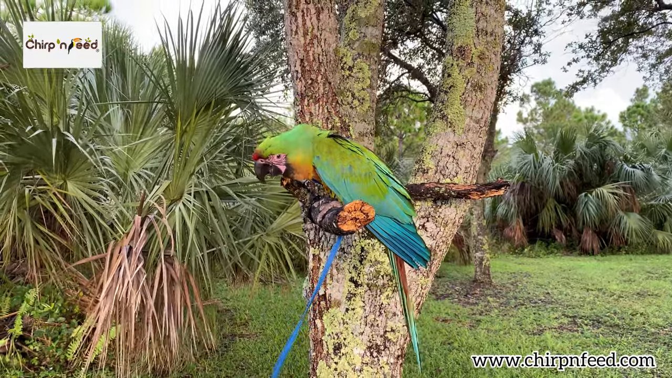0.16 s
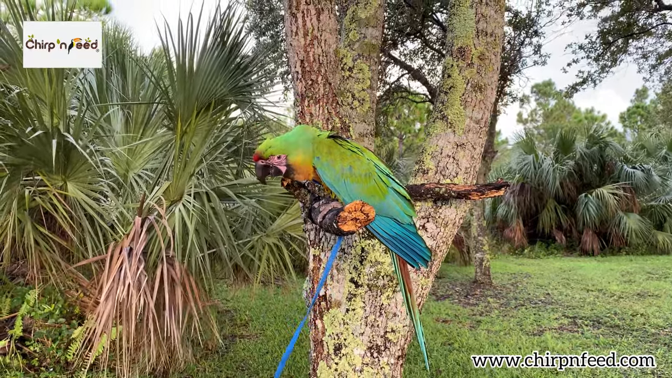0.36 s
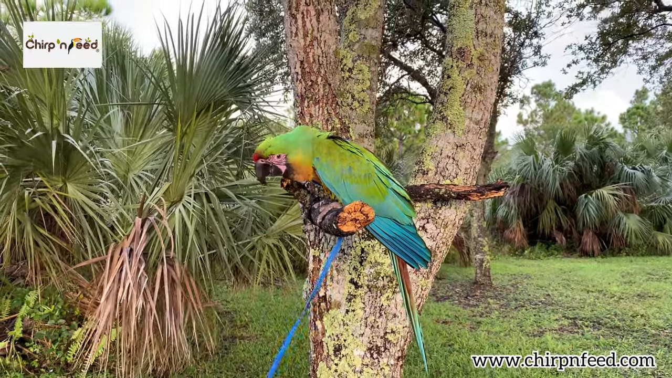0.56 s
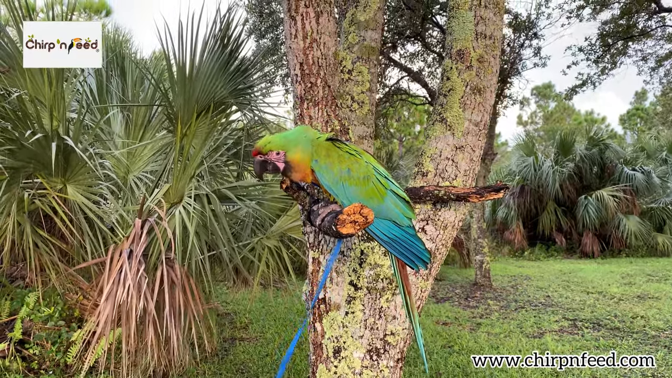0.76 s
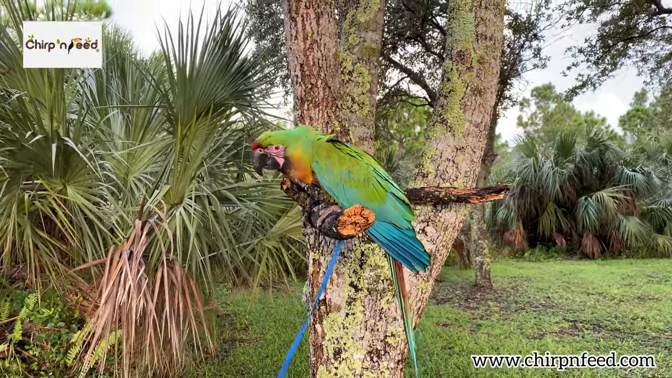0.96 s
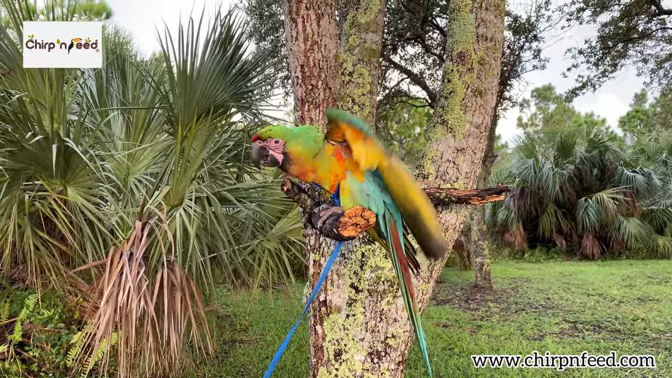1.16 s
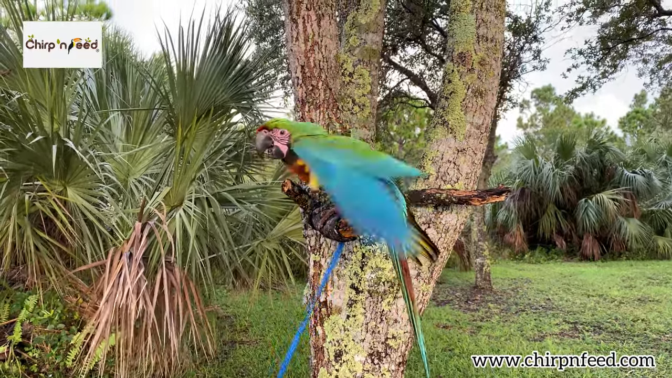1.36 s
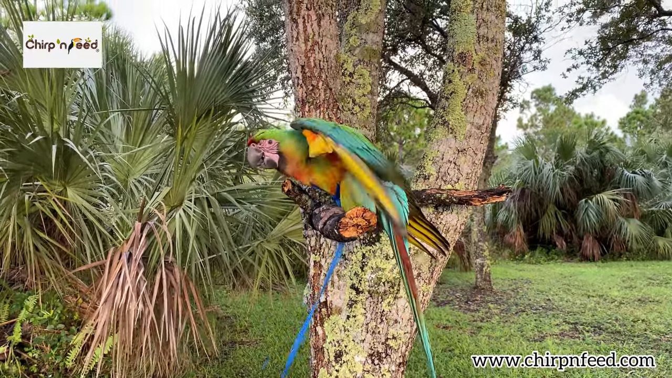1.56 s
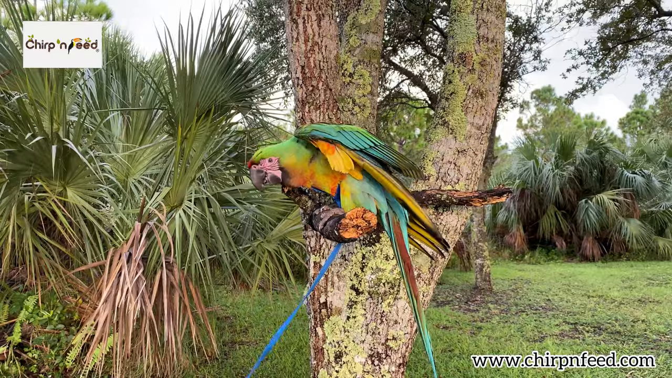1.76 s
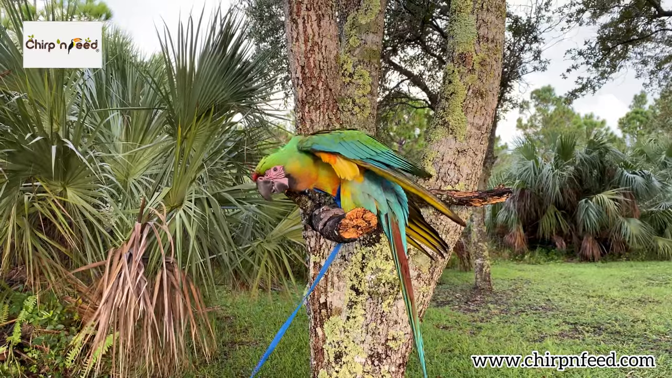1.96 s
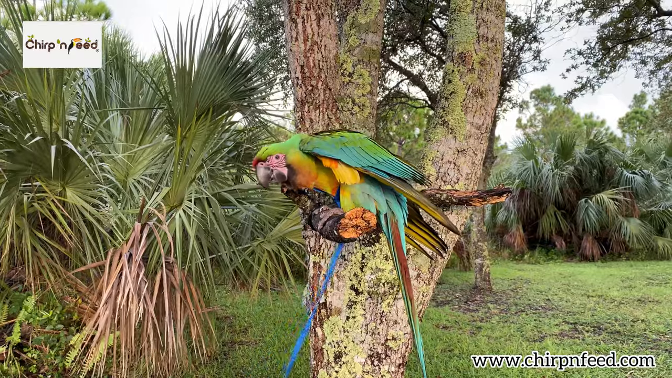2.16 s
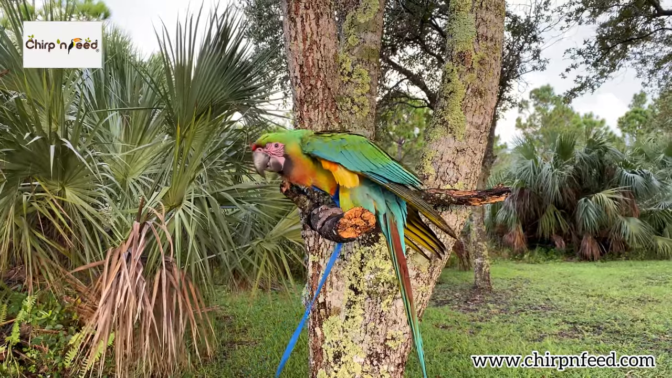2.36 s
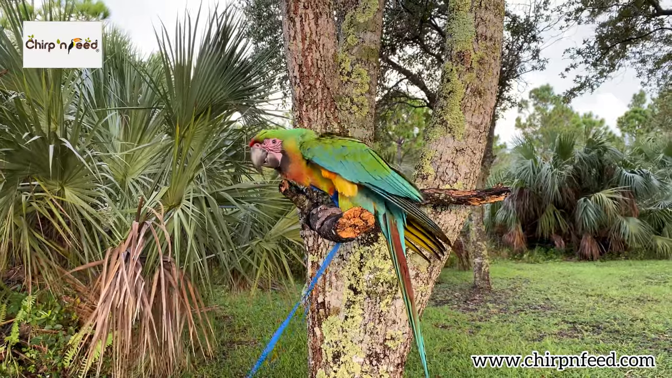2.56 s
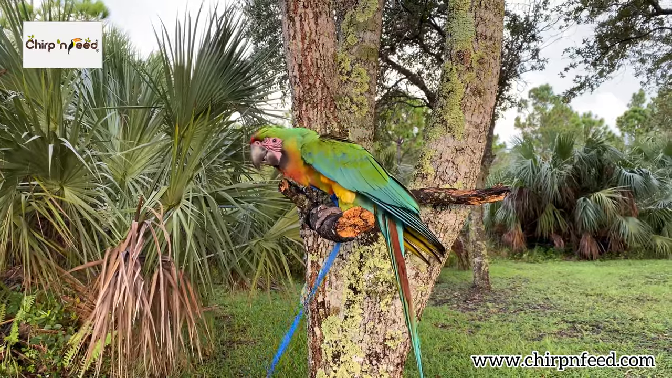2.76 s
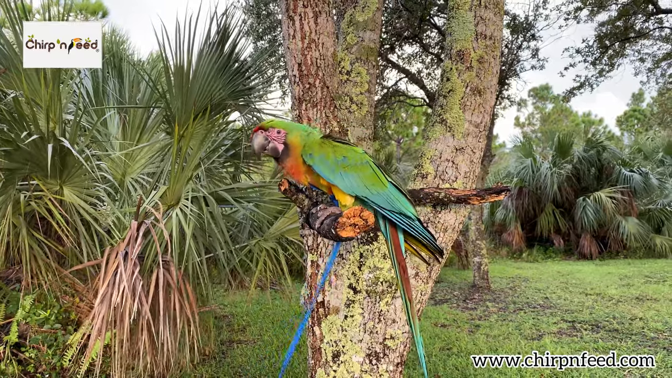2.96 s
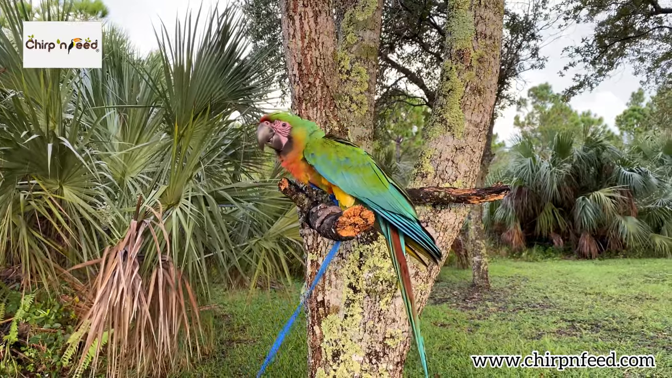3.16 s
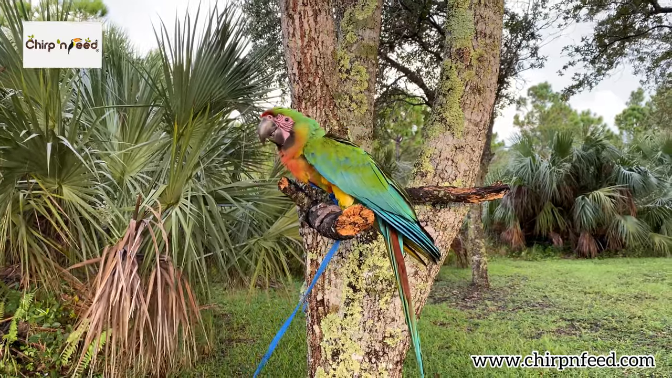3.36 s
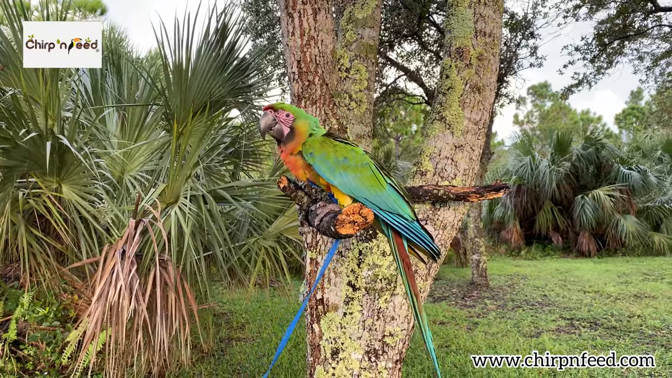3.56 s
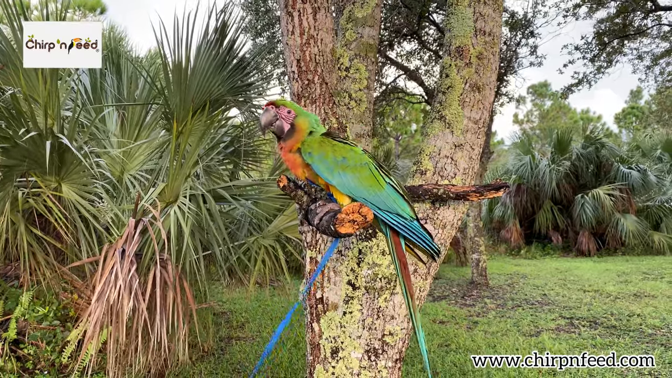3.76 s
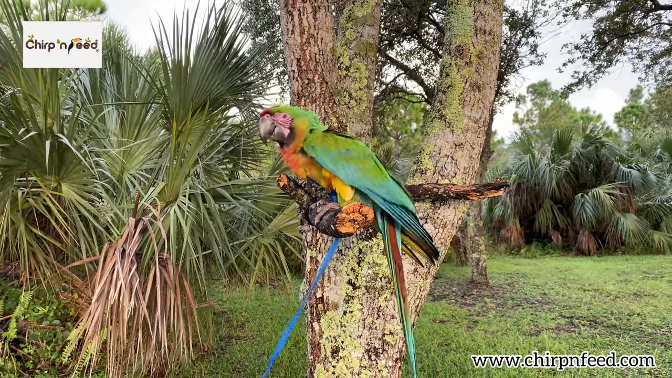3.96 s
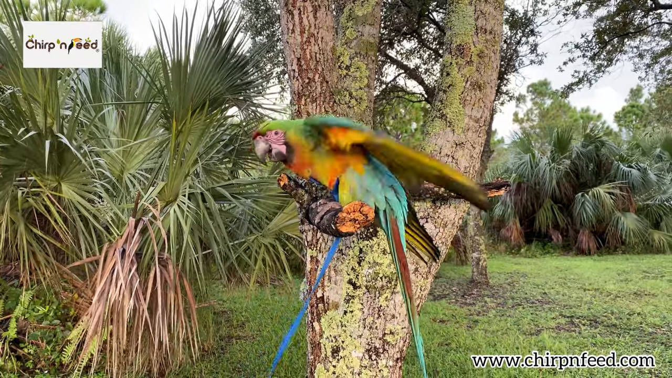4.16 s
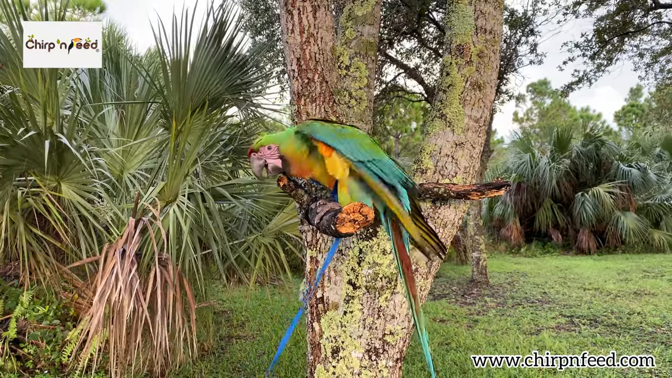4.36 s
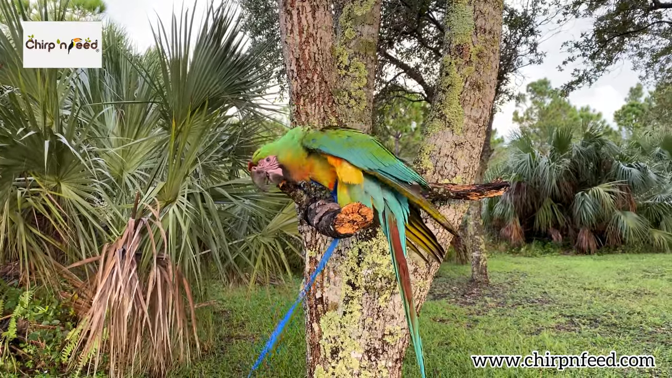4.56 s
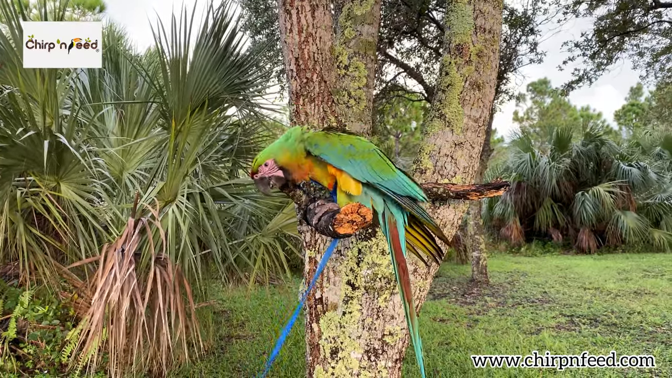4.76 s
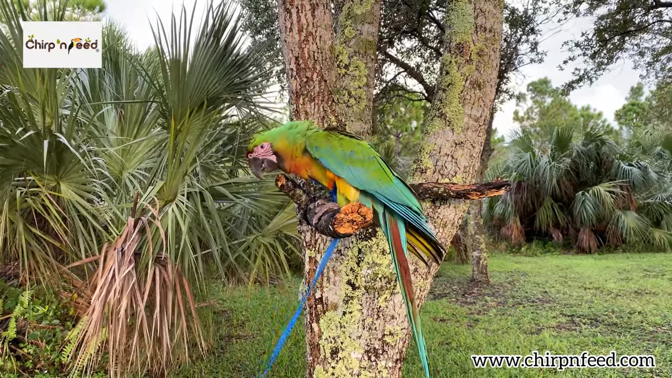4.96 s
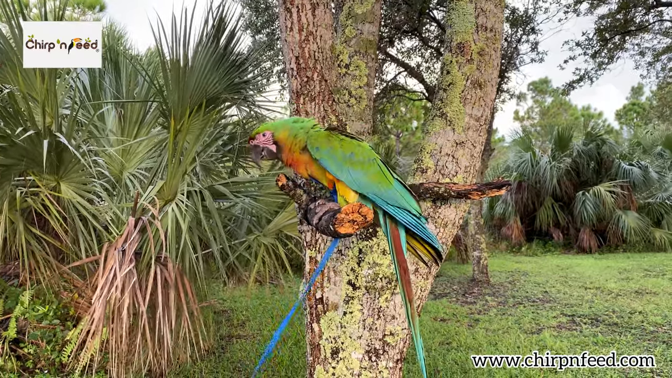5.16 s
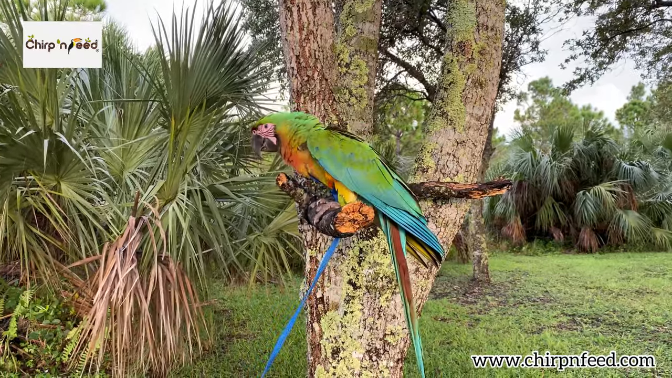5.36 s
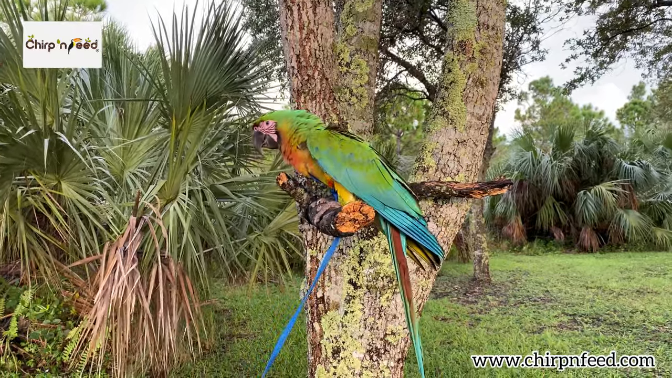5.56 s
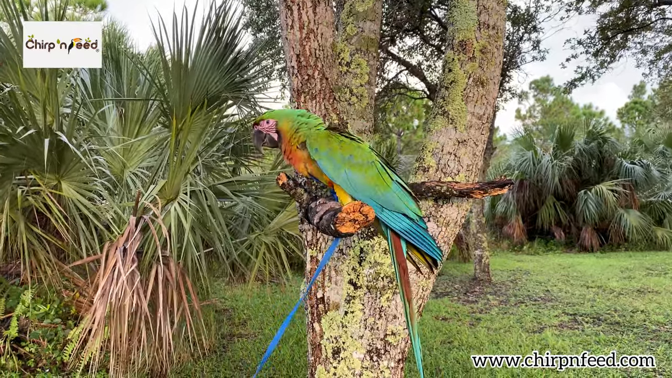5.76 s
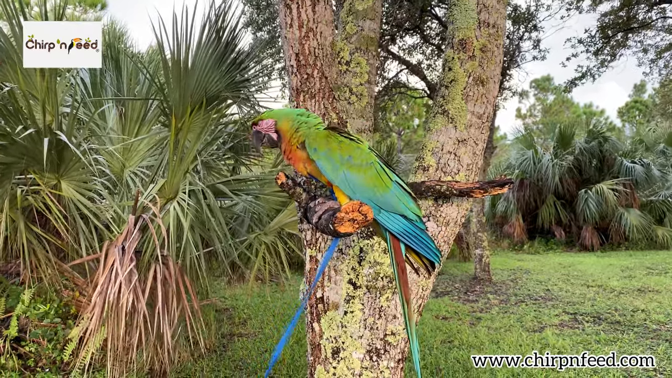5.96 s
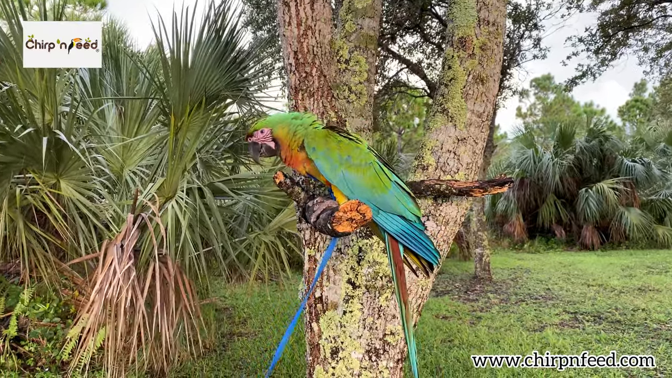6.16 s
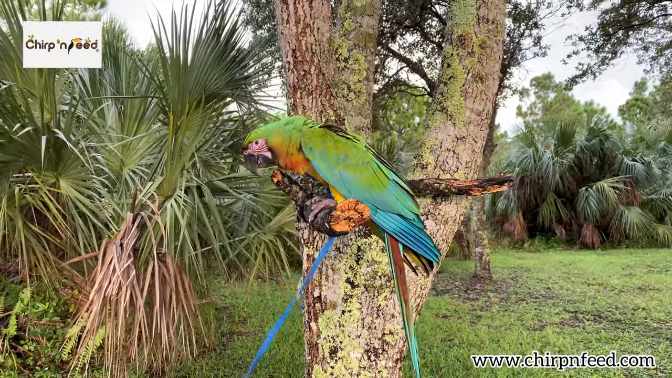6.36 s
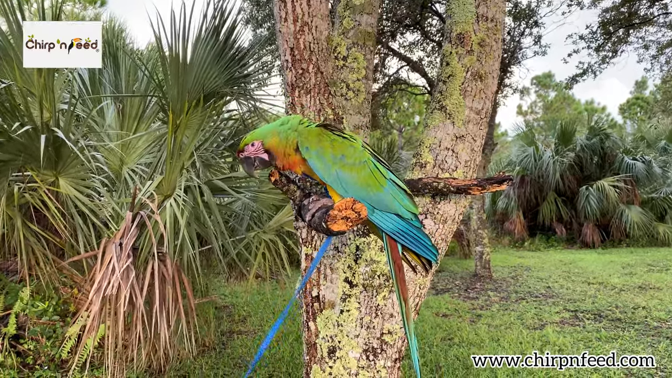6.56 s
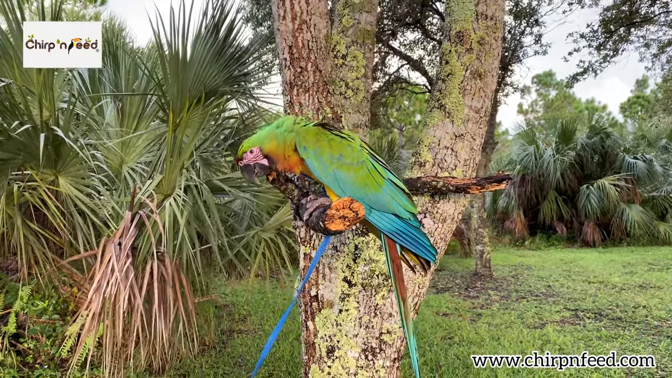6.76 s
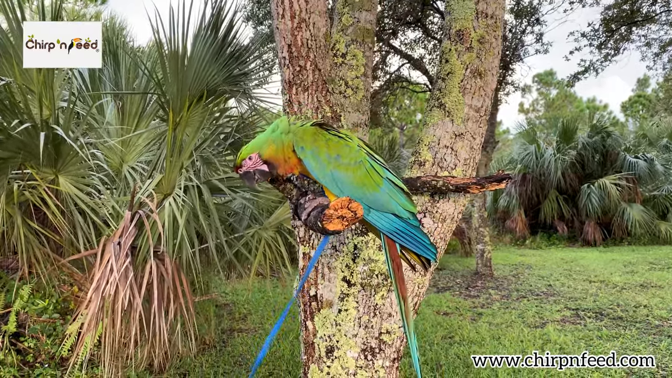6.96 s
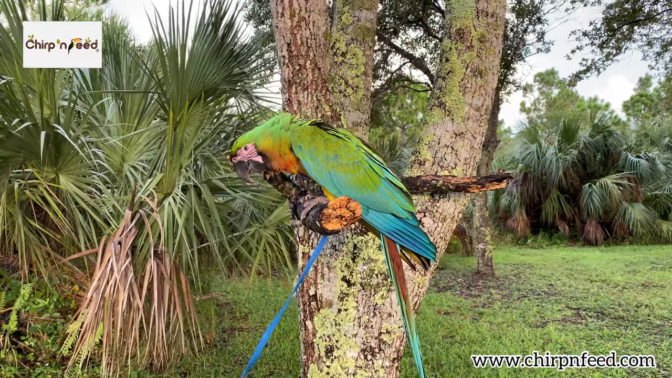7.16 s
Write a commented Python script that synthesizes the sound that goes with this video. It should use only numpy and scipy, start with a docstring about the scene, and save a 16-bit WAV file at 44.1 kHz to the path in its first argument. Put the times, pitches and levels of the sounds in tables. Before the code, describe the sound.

Close stereo pickup of a macaw among trees and lawn: a quiet, rumbling background with gentle wind thumps, then a sudden raspy quarter-second squawk and crisp wing flicks. A car swells faintly far off, and a stronger gust passes. Another rough, bright squawk follows about three seconds after the first, with light feather noise. Faint whistling chirps, insect buzzes and a remote drone fill the quiet ending.

```python
"""Macaw on a garden perch

A macaw close to two microphone ports flicks its wings and gives two short, harsh squawks: rough pulses
ring in throat and beak, cracks are added, and a reflection off the lawn doubles each call.
Filtered noise makes light wind rumble, far traffic, passing cars, a distant drone, leaves, insects,
one dry tick and faint microphone hiss. Small birds are gliding sine whistles blurred by the trees."""
import sys
import numpy as np
from scipy import signal
from scipy.fft import rfft, irfft
from scipy.io import wavfile
from scipy.ndimage import uniform_filter1d

SR = 44100
rng = np.random.default_rng(int(sys.argv[2]) if len(sys.argv) > 2 else 0)


def generate_wav(signal):
    """Clip the signal to [-1, 1] and save it as 16-bit WAV at the path in sys.argv[1]."""
    frames = np.transpose(np.atleast_2d(signal))
    scaled = np.clip(frames, -1, 1) * 32767
    pcm = np.round(scaled).astype(np.int16)
    wavfile.write(sys.argv[1], SR, pcm)


N = 317520
TIME = np.arange(N) / SR
FREQS = np.maximum(np.fft.rfftfreq(N, 1 / SR), 1)


def from_db(db):
    """Decibels to gain."""
    return 10 ** (np.asarray(db) / 20)


def rms_one(x):
    """Scale to unit rms."""
    return x / np.sqrt(np.mean(x ** 2) + 1e-20)


def in_hz(points):
    """A spectrum table at every frequency, joined on a log axis."""
    hz, value = np.transpose(points)
    return np.interp(np.log(FREQS), np.log(hz), value)


def left_right(balance_db):
    """Gains of the two channels from left minus right in dB."""
    return from_db(np.array([balance_db, -balance_db]) / 2)


def drift(rate_hz):
    """Slow chance with unit rms, made by low-passing noise."""
    smooth = 1 / (1 + (FREQS / rate_hz) ** 2) ** 2
    return rms_one(irfft(rfft(rng.standard_normal(N)) * smooth, N))


def resonance(x, hz, width_hz):
    """Two-pole band-pass with gain 1 on top."""
    r = np.exp(-np.pi * width_hz / SR)
    numerator = np.array([1, 0, -1]) * (1 - r * r) / 2
    denominator = [1, -2 * r * np.cos(2 * np.pi * hz / SR), r * r]
    return signal.lfilter(numerator, denominator, x + 1e-18)


def colour(x, spectrum):
    """Causal (minimum-phase) filter of unit energy: it rings only after each pulse."""
    cepstrum = irfft(np.log(from_db(in_hz(spectrum))), N)
    # fold the second half of the cepstrum onto the first
    cepstrum[1:N // 2] *= 2
    cepstrum[N // 2 + 1:] = 0
    response = np.exp(rfft(cepstrum))
    unit_response = response / np.sqrt(np.mean(np.abs(response) ** 2))
    return irfft(rfft(x) * unit_response, N)


def air_noise(spectrum):
    """Stereo noise of rms 1: mixed mid and side noise sets how alike the ports are at each pitch."""
    # likeness of the two ports: hz, likeness (-1 to 1)
    likeness = [(60, 0.46), (130, 0.62), (300, 0.84), (640, 0), (1000, -0.28), (1400, -0.55), (3100, 0.15),
                (7000, 0), (15000, 0.14)]
    # lean of the noise across the ports: hz, left_minus_right_db
    lean = [(60, 0), (110, 0.5), (200, 0), (380, 3), (700, -0.5), (1290, -2.5), (2380, -2.0), (4400, 7),
            (8120, 0), (15000, 0.5)]
    mid, side = rfft(rng.standard_normal((2, N)))
    alike = np.clip(in_hz(likeness), -1, 1)
    pair = np.sqrt(1 + alike) * mid + np.sqrt(1 - alike) * side * [[1], [-1]]
    return rms_one(irfft(pair * from_db(in_hz(spectrum)) * left_right(in_hz(lean)), N))


def swells(rows):
    """A bell-shaped envelope round the middle of each event."""
    envelope = 0
    for middle_s, length_s, level_db in rows:
        distance_squared = np.minimum((2 * (TIME - middle_s) / length_s) ** 2, 20)
        envelope = envelope + from_db(level_db) * np.exp(-distance_squared)
    return envelope


def held(start_s, length_s, edge_s):
    """Rise, hold and fall between 0 and 1; half way up at the start and at the end."""
    nearest_end = np.minimum(TIME - start_s, start_s + length_s - TIME)
    return np.clip(nearest_end / edge_s + .5, 0, 1)


def spells(rows, edge_s):
    """Gain of held events whose powers add."""
    return np.sqrt(sum(from_db(db) ** 2 * held(start, length, edge_s) for start, length, db in rows))


def trees(x, t60_s, dull_hz):
    """Diffuse scatter from trunks and fronds: a fading noise tail, different on each side."""
    t = TIME[:SR]
    fade = from_db(-60 * t / t60_s) * (1 - np.exp(-t / 0.0017))
    tail = rng.standard_normal((2, SR)) * fade
    tail = signal.sosfilt(signal.butter(1, min(dull_hz, SR / 3), fs=SR, output="sos"), tail)
    return signal.fftconvolve(x[None], rms_one(tail) / np.sqrt(SR), axes=1)[:, :N]


def distance(waver_db):
    """Coloured noise for far traffic, passing cars, a drone that grows later on, and leaves."""
    # colour of far traffic: hz, relative_db
    traffic_colour = [(25, -44), (60, -23.5), (130, -1), (250, -4), (420, -5), (620, -12.5), (850, -7.5),
                      (1050, -10.5), (1400, -18), (2000, -24), (3000, -36), (5000, -64.5), (12000, -72),
                      (14000, -73)]
    # cars that swell and fade as they pass: nearest_s, length_s, level_db
    cars = [(0, 0.53, -67), (2.55, 1.83, -53.5)]
    # colour of their engines and tyres: hz, relative_db
    car_colour = [(70, -5), (170, 22), (330, 3), (650, -4), (900, 13), (1040, 18), (1200, 8.5), (1600, -43)]
    # a distant drone that comes and goes: start_s, length_s, level_db
    drones = [(-.3, 0.96, -72.5), (2.9, 1.6, -80), (4.35, 0.64, -65), (4.95, 0.87, -66), (5.75, 3.6, -62.3)]
    # colour of the drone: hz, relative_db
    drone_colour = [(900, -33), (1300, -0.5), (1800, 2.5), (2050, 0), (2300, 5), (2600, -13.5), (3500, -19),
                    (6000, -43.5)]
    # stirrings of the leaves over their faint hiss: middle_s, length_s, level_db
    rustles = [(0, 1.66, -77), (1.6, 1.7, -86), (2.7, 0.34, -87), (5.98, 0.84, -83), (6.9, 1.1, -88)]
    # colour of the leaves: hz, relative_db
    leaf_colour = [(1000, -2.5), (2500, -1), (4400, 4.5), (5600, -6), (7200, -2.5), (9000, -16.5),
                   (12000, -15.5), (15000, -32)]
    traffic_db, leaves_db, drone_edge_s = -51.5, -86, 0.23
    layers = [(from_db(traffic_db), traffic_colour),
              (swells(cars), car_colour),
              (spells(drones, drone_edge_s), drone_colour),
              (from_db(leaves_db) + swells(rustles), leaf_colour)]
    return sum(gain * from_db(waver_db * drift(12.3)) * air_noise(spectrum) for gain, spectrum in layers)


def wind(lumps_db, buffet_hz, buffet_width_hz):
    """Lumpy rumble on the ports, with single eddies that thump."""
    # gusts over the steady breeze: start_s, length_s, level_db
    gusts = [(0, 0.34, -51.5), (.76, .15, -45), (1.32, 0.28, -48), (2.1, 0.12, -47), (2.85, 0.24, -46.5),
             (3.26, 0.45, -38.5), (4.19, 0.19, -47.5), (5.87, 1.45, -45.5), (6.22, 0.43, -46),
             (6.94, 0.56, -47.5)]
    # colour of the rumble: hz, relative_db
    rumble_colour = [(20, -42), (35, -13.5), (55, 1), (80, 1.5), (150, -5.5), (250, -18), (450, -35.5),
                     (900, -59), (4000, -100)]
    # single buffets, the strongest setting the peak of all: start_s, peak_db
    buffets = [(.765, -32.5), (.820, -27), (.893, -35), (1.012, -36), (1.503, -37), (2.16, -36.5),
               (3.491, -32), (4.245, -33), (4.886, -35.5), (6.332, -35), (6.989, -34.5)]
    breeze_db, gust_edge_s = -51, .06
    flow = np.hypot(from_db(breeze_db), spells(gusts, gust_edge_s))
    rumble = flow * rms_one(air_noise(rumble_colour) * from_db(lumps_db * drift(25)))
    eddies = np.zeros(N)
    for start_s, peak_db in buffets:
        eddies[int(start_s * SR)] = from_db(peak_db)
    low_pass = signal.butter(3, 260, fs=SR, output="sos")
    thumps = signal.sosfilt(low_pass, resonance(eddies, buffet_hz, buffet_width_hz))
    return rumble + thumps * eddies.max() / np.abs(thumps).max()


def microphone_hiss(level_db):
    """The microphone's own faint hiss, as steady noise."""
    # colour of the hiss: hz, relative_db
    hiss_colour = [(1000, -9), (6000, 2), (9000, -6), (12000, -1.5), (13500, -20)]
    return from_db(level_db) * air_noise(hiss_colour)


def insects(flutter_db):
    """Short, high buzzes: a narrow band of noise whose level flutters."""
    # buzzes: middle_s, length_s, level_db
    buzzes = [(.1, 0.47, -84.5), (.55, .5, -94), (.86, 0.14, -79.5), (2.73, 0.11, -78), (3.72, 0.15, -84.5),
              (4.68, 0.094, -82), (5.58, 0.2, -83.5), (6.2, 0.13, -86), (6.8, .2, -83)]
    # colour of a buzz: hz, relative_db
    buzz_colour = [(6000, -28), (6900, 5), (7300, 10), (7900, -2), (8700, -43)]
    return swells(buzzes) * rms_one(from_db(flutter_db * drift(80))) * air_noise(buzz_colour)


def songbirds(trill_hz, trill_width, flutter_db, scatter_db):
    """Gliding whistles, some with a fast uneven trill, blurred by the trees."""
    # small birds, levels before flutter and the mix of direct and scattered sound:
    # start_s, length_s, first_hz, middle_hz, last_hz, level_db, trill_depth (0-1)
    chirps = [(0.783, .06, 4090, 3730, 3180, -72, .5), (0.887, 0.053, 4130, 3640, 3170, -74.5, .16),
              (1.031, 0.033, 4290, 3950, 3900, -73.5, .1), (1.986, .053, 5000, 4750, 4620, -75, 0.2),
              (2.529, .04, 4010, 4900, 5100, -73, .6), (2.556, 0.068, 4670, 3770, 3500, -67, 0.72),
              (2.723, .11, 3140, 3600, 4950, -71.5, .3), (2.797, .055, 5030, 4960, 4600, -81, .6),
              (3.323, 0.027, 2890, 3030, 3050, -71, .26), (3.407, 0.095, 5230, 5200, 5420, -79, 0.7),
              (3.896, 0.047, 4600, 4570, 4280, -78, .6), (4.59, 0.033, 4800, 4270, 4000, -80.5, .5),
              (4.683, .11, 3740, 3790, 3560, -75.5, .1), (5.2, .12, 3040, 2970, 2900, -79, 0.5),
              (5.345, .04, 4380, 5020, 4300, -66.5, 0.1), (5.349, 0.031, 3200, 3520, 3700, -69.5, .7),
              (5.377, 0.057, 4370, 4270, 4200, -68, 0.07), (5.773, 0.02, 4250, 4100, 3900, -75, 0),
              (6.46, .08, 3700, 3750, 3680, -80, 0.06), (6.466, 0.023, 3180, 2970, 2830, -62, 0.4),
              (6.515, .027, 4730, 5300, 5600, -77, .2), (6.556, 0.089, 5130, 5140, 5150, -73, .65)]
    song = np.zeros(N)
    wobble, flutter = drift(trill_hz), from_db(flutter_db * drift(90))
    for start_s, length_s, first_hz, middle_hz, last_hz, level_db, trill in chirps:
        u = np.linspace(0, 1, int(length_s * SR))
        at = max(int(start_s * SR), 0) + np.arange(len(u))
        glide_hz = np.interp(u, [0, .5, 1], [first_hz, middle_hz, last_hz])
        hz = glide_hz * (1 + trill_width * trill * wobble[at])
        envelope = np.sqrt(2 * np.abs(np.sin(np.pi * u)))
        whistle = np.sin(2 * np.pi * np.cumsum(hz) / SR)
        song[at] += from_db(level_db) * flutter[at] * envelope * whistle
    direct = song * left_right(np.array([3.0])) * from_db(-4.0)
    return direct + from_db(scatter_db) * trees(song, t60_s=0.27, dull_hz=8000)


def dry_tick():
    """A short burst of coloured noise."""
    # the tick: middle_s, length_s, level_db
    ticks = [(.165, 0.024, -54.5)]
    # its colour: hz, relative_db
    tick_colour = [(1300, -10), (2000, 11), (2900, 7), (3500, -19), (4300, 6), (5500, -34)]
    return swells(ticks) * air_noise(tick_colour)


def wings(grain_db):
    """Feathers slide over one another in tiny catches: noise with a grainy level."""
    # feather strokes and flicks: middle_s, length_s, level_db
    strokes = [(.55, 0.26, -82.5), (1.168, .037, -70), (1.32, 0.28, -67), (1.468, .008, -62),
               (1.493, 0.036, -59.5), (1.52, 0.072, -67.5), (1.565, 0.0055, -67), (1.60, .058, -71.5),
               (1.73, 0.11, -83.5), (2.51, .012, -77), (2.908, 0.0021, -74), (4.115, .064, -71.5),
               (4.24, 0.27, -72), (6.115, .01, -78)]
    # colour of the feathers: hz, relative_db
    feather_colour = [(1000, -32), (2500, 0), (4500, -3), (7000, 3.5), (9500, -3.5), (12000, 0.5),
                      (15500, -13)]
    return swells(strokes) * rms_one(from_db(grain_db * drift(220))) * air_noise(feather_colour)


def effort(start_s, length_s, level_db, pitch_hz):
    """Pitch, gain, roughness and gape of one squawk: each push draws them away from the plain rasp."""
    # hard pushes change the rasp's loudness, pitch and roughness and open the beak; roughness is before
    # the break-up ramp and level before the voice trim:
    # start_s, length_s, level_db, first_pitch_hz, last_pitch_hz, roughness (0-1), beak_gape (0-1)
    pushes = [(1.201, 0.059, -32, 176.3, 290.9, 0.56, 0.37), (1.358, 0.033, -31.5, 229.4, 259.4, 0.6, 0.4),
              (1.378, 0.051, -32, 333.7, 295, .38, 0.9), (4.138, .04, -33, 284.4, 293.8, .05, 1),
              (4.168, .044, -31.3, 345, 270.1, 0.41, 1)]
    rough, gape = .74, 0.061  # the plain rasp, each 0-1
    push_edge_s, attack_s, release_s, breakup_s = .014, 0.003, 0.038, .035
    for at_s, push_s, push_db, first_hz, last_hz, push_rough, push_gape in pushes:
        push = held(at_s, push_s, push_edge_s)
        push_hz = np.interp(TIME, [at_s, at_s + push_s], [first_hz, last_hz])
        pitch_hz = pitch_hz + push * (push_hz - pitch_hz)
        level_db = level_db + push * (push_db - level_db)
        rough = rough + push * (push_rough - rough)
        gape = gape + push * (push_gape - gape)
    # the first squawk catches briefly
    catch_s, catch_length_s, catch_db = 1.308, .011, -23
    catch = held(catch_s - catch_length_s / 2, catch_length_s, catch_length_s / 2)
    level_db = level_db + catch_db * catch
    age_s = TIME - start_s
    envelope = np.clip(np.minimum(age_s / attack_s, (length_s - age_s) / release_s), 0, 1)
    # the voice starts clean and breaks up
    rough = rough * np.clip(age_s / breakup_s, 0, 1) ** 2
    return pitch_hz, from_db(level_db) * envelope, rough, gape


def syrinx(pitch_hz, rough, sounding_s, jitter, shimmer_db, hiss_db, puff_s):
    """Membranes slap shut once a cycle; when rough they slap unevenly and let out puffs of turbulence."""
    pulses, at = np.zeros(N), sounding_s[0] * SR
    for uneven_time, uneven_strength in np.clip(rng.standard_normal((200, 2)), -2, 2):
        if at >= sounding_s[1] * SR:
            break
        i = round(at)
        period = SR / pitch_hz[i] * np.exp(jitter * rough[i] * uneven_time)
        pulses[i] = np.sqrt(period) * from_db(shimmer_db * rough[i] * uneven_strength)
        at += period
    fade = np.exp(-1 / (puff_s * SR))
    puffs = signal.lfilter([np.sqrt(1 - fade ** 2)], [1, -fade], pulses + 1e-18)
    return pulses + from_db(hiss_db) * rough * puffs * rng.standard_normal(N)


def squawk(row, beak):
    """Pulses ring in the throat and windpipe; the opening beak adds its own resonances."""
    # throat colour: hz, relative_db
    throat = [(100, -14), (330, -2.5), (560, -12.5), (700, -2.5), (900, 3), (1250, -2.5), (1750, 0.5),
              (2050, -8), (2500, -3.5), (3250, -6.5), (3700, -13), (4250, -21), (4700, -9), (6100, -18.5),
              (6900, -26.5), (9000, -25), (15000, -51)]
    # narrow resonances of the windpipe: hz, width_hz, level_db
    windpipe = [(910, 230, -13.5), (2450, 48, -6), (3517, 58, -3.5), (4580, 130, 0), (6100, 220, -5)]
    # bands where the throat delays each pulse: hz, width_hz
    spread = [(1000, 1500), (1700, 1200)]
    pitch_hz, gain, rough, gape = effort(*row)
    start_s, end_s = row[0], row[0] + row[1]
    source = syrinx(pitch_hz, np.clip(rough, 0, 1), (start_s, end_s),
                    jitter=.2, shimmer_db=5, hiss_db=0, puff_s=.002)
    voice = colour(source, throat)
    voice = voice + sum(from_db(db) * resonance(voice, hz, width) for hz, width, db in windpipe)
    voice = voice + gape * sum(from_db(db) * resonance(voice, hz, width) for hz, width, db in beak)
    # the nearly shut beak makes the rasp hollow and muffles its treble
    voice = voice + (1 - gape) * from_db(-4.5) * resonance(voice, hz=930, width_hz=260)
    muffle_hz, share_lost = 3700, 0.48
    treble = signal.sosfilt(signal.butter(1, muffle_hz, "high", fs=SR, output="sos"), voice)
    voice = voice - (1 - gape) * share_lost * treble
    # a narrow gap in the rasp's spectrum
    voice = voice - resonance(voice, hz=3240, width_hz=250)
    # all-passes: the body of each pulse swells a moment after its sharp edge
    for hz, width_hz in spread:
        voice = voice - 2 * resonance(voice, hz, width_hz)
    # air pressure, not the single slap, sets the loudness
    inside = uniform_filter1d(((TIME >= start_s) & (TIME <= end_s)) * 1.0, size=800)
    power = uniform_filter1d(voice ** 2, size=800)
    return voice * gain * np.sqrt(np.abs(inside) / (np.abs(power) + 1e-3))


def macaw(voice_trim_db, scatter_db):
    """Squawks with sharp cracks, reflected off the trunk and the lawn and scattered by the trees."""
    # squawks, each a low rasp, level before the voice trim: start_s, length_s, level_db, pitch_hz
    squawks = [(1.194, 0.25, -37.5, 203.4), (4.1445, 0.24, -37, 199.8)]
    # resonances that grow as the beak opens, one set for each squawk: hz, width_hz, level_db
    beaks = [
        [(1250, 70, 12), (1830, 190, 4), (2290, 21, 17.5), (3080, 350, 7), (3520, 80, 5)],
        [(1343, 154, 7), (1780, 47, -3), (2440, 120, 2.5), (3080, 110, 10), (4100, 130, 8.5)],
    ]
    # the hardest cracks in the rasp: start_s, strength_db
    crack_times = [(1.2232, -14), (1.2602, -22), (1.2942, -27), (1.3458, -24), (1.3708, -17.5),
                   (4.2143, -17.5), (4.2350, -20.5), (4.2535, -26), (4.2773, -21.5), (4.3115, -21),
                   (4.3358, -25), (4.3502, -24)]
    # colour of a crack: hz, relative_db
    crack_colour = [(300, -15), (950, 5), (1900, 4), (3200, 0), (4800, 10.5), (6300, -4.5), (7500, -3.5),
                    (11000, -11.5), (15500, -26)]
    # reflections of the squawk: delay_s, level_db, dull_above_hz, left_lead_s
    reflections = [(.00135, -15.5, 6040, -.0001), (.0062, -4.5, 3500, .00006), (0.0118, -22, 5000, .0002),
                   (0.0182, -48, 5000, 0.0001)]
    # phase of the bird at the two microphone ports: hz, left_lead_radians
    port_phase = [(100, -1), (700, 0.1), (1400, 0.36), (2000, 0.75), (3100, 3), (4500, 1.5), (6000, 4),
                  (8000, 4.5), (10000, 1.5), (11500, 4)]
    # balance of the bird at the ports: hz, left_minus_right_db
    port_balance = [(300, 1), (800, 1), (1900, -7.5), (2600, -2.5), (3300, 1.5), (3950, 21), (4300, 1),
                    (5300, 6), (6200, -5.5), (7500, -0.5), (15000, 1)]
    clicks = np.zeros(N)
    for start_s, strength_db in crack_times:
        clicks[int(start_s * SR)] = from_db(strength_db)
    calls = sum(squawk(row, beak) for row, beak in zip(squawks, beaks))
    voice = from_db(voice_trim_db) * calls + colour(clicks, crack_colour)
    # each reflection is duller than the direct sound and has its own lead between the ports
    paths = 1
    for delay_s, level_db, dull_hz, lead_s in reflections:
        arrival_s = delay_s + np.array([[-lead_s], [lead_s]]) / 2
        dulling = np.sqrt(1 + (FREQS / dull_hz) ** 2)
        paths = paths + from_db(level_db) * np.exp(-2j * np.pi * FREQS * arrival_s) / dulling
    ports = left_right(in_hz(port_balance)) * np.exp(.5j * in_hz(port_phase) * [[1], [-1]])
    at_ports = irfft(rfft(voice) * paths * ports, N)
    return at_ports + from_db(scatter_db) * trees(voice, t60_s=0.15, dull_hz=7000)


def scene():
    """The bird in its garden."""
    background = distance(waver_db=0.45) + wind(lumps_db=2.0, buffet_hz=83.5, buffet_width_hz=102)
    hiss = microphone_hiss(level_db=-89)
    garden = insects(flutter_db=4.5)
    garden = garden + songbirds(trill_hz=250, trill_width=.06, flutter_db=4.5, scatter_db=-8.0)
    bird = wings(grain_db=4.0) + macaw(voice_trim_db=-0.5, scatter_db=-12.5)
    return background + hiss + garden + dry_tick() + bird


def record(dry):
    """A steep low-pass cuts the top of the treble."""
    cutoff_hz = 16050
    return signal.sosfilt(signal.ellip(10, .1, 70, cutoff_hz, fs=SR, output="sos"), dry)


dry = scene()
out = record(dry)
generate_wav(out)
```